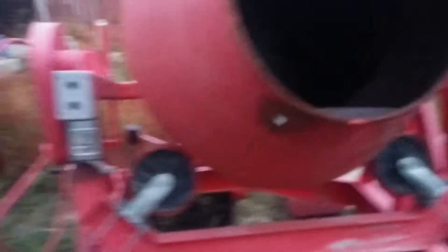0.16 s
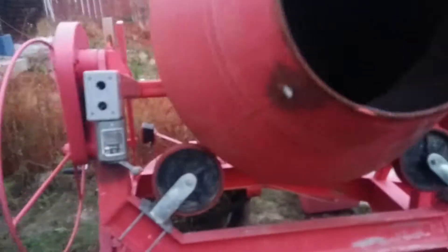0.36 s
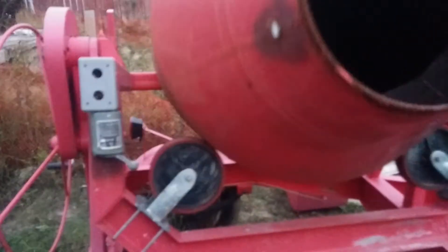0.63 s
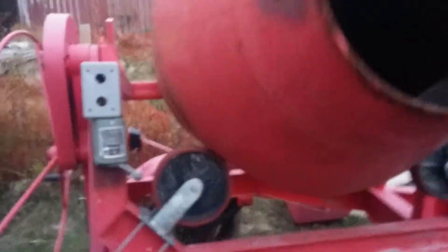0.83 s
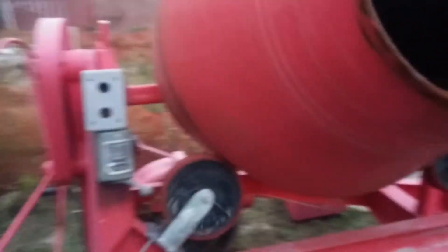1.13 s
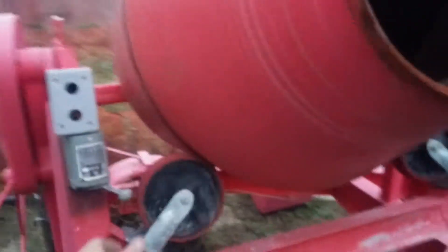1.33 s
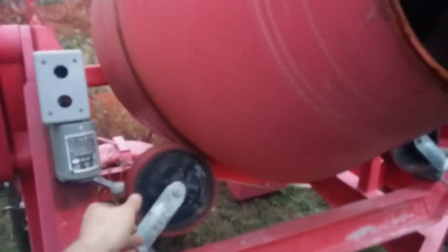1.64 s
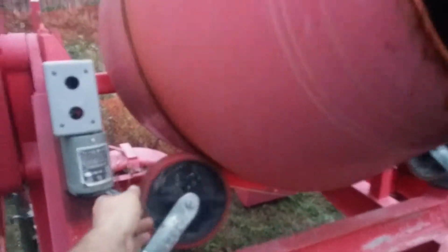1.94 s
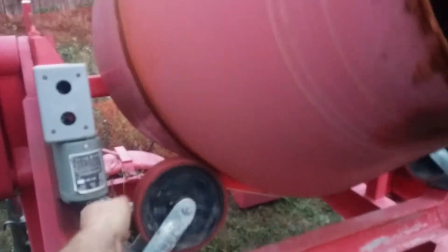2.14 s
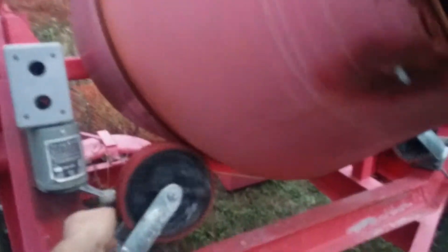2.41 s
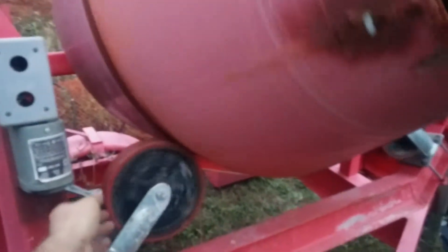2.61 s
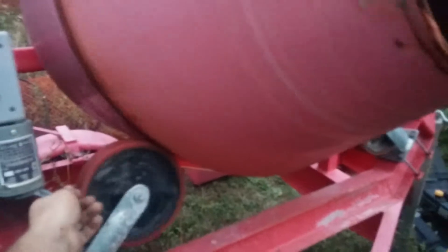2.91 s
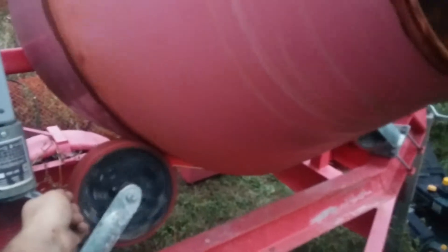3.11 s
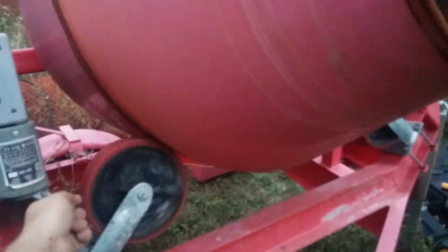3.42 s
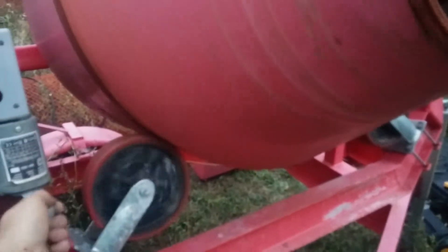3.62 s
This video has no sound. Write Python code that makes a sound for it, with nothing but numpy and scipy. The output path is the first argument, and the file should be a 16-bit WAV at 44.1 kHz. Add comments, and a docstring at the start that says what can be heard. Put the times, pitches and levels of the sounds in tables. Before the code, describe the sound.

A cement mixer drum turns with a low knocking rumble, rattling metal and hissing, clattering grit.

```python
"""A steady rumble with a knock at every gear tooth: a small cement mixer turns outdoors, heard close by.
Each tooth jolts the steel drum, which rumbles, booms and rattles as decaying tones shaken by tiny hits.
Grit hisses down the wall as filtered noise, soft lumps thud, and hard pieces skip and clatter.
Now and then the frame clanks or a roller rasps; a faint steady hiss lies behind it all."""
import sys
import numpy as np
from scipy import signal
from scipy.fft import rfft, irfft
from scipy.io import wavfile
from scipy.ndimage import uniform_filter1d

SR = 44100
rng = np.random.default_rng(int(sys.argv[2]) if len(sys.argv) > 2 else 0)


def generate_wav(sig):
    """Save sig (samples, or channels by samples) to the path in sys.argv[1] as 16-bit PCM at SR."""
    pcm = np.round(np.clip(np.atleast_2d(sig).T, -1, 1) * 32767).astype(np.int16)
    wavfile.write(sys.argv[1], SR, pcm)


N = 165816  # length in samples

# A "mode" is one tone at which a part likes to ring; T60 is the time a ring takes to drop by 60 dB.
# Drum modes, from low to hollow to booming. Each row: pitch in Hz, level in dB, T60 in seconds.
LOW_MODES = [(158.9, -8, 0.23), (181.2, 3.5, 0.27), (209.7, -1, 0.42), (249, -3, 0.3), (298.2, 4, 0.29),
             (316.3, 4.5, 0.11)]
HOLLOW_MODES = [(359.4, -3.5, 0.17), (384.4, -9, 0.23), (413.8, 1.5, 0.33), (432, -13, 0.36)]
BOOM_MODES = [(449, -4, 0.17), (487, 6, 0.33), (525, 0.5, 0.21), (566, 0, 0.17), (594.5, 3.5, 0.25),
              (687.3, -3, 0.084)]
# Modes of the parts that carry the drum. Each row: pitch in Hz, level in dB, T60 in seconds.
CLANK_MODES = [(926, 8, 0.053), (933, 0.5, 0.4), (1001, 4.5, 0.096), (1043, 7.5, 0.11), (1123, 0.5, 0.061),
               (1135, 11.5, 0.054), (1292, 1, 0.09)]
# Wall modes heard in the rattle. Each row: pitch in Hz, level in dB, T60 in seconds.
RATTLE_MODES = [(1358, -11, 0.1), (1440, -2.5, 0.49), (1573, -9, 0.049), (1513, -8, 0.28),
                (1754, 3.5, 0.17), (2032, 1, 0.039), (2290, -1, 0.12), (2465, -3, 0.23)]
# Long rings of the shell under hard blows. Each row: pitch in Hz, level in dB, T60 in seconds.
RING_MODES = [(2266, -3, .3), (2325, -6, .25), (2410, -6, .35), (2497, -3, .4), (2586, 1, .45),
              (2652, -4, .4), (2718, -4, .4), (3888, -2, .33), (3969, -2, .33), (4824, -4, .35),
              (4847, 0, .38), (4932, -7, .3), (5298, -3, .4), (5822, -4, .4)]

# Colours: how strongly each sound lets every pitch through. Each row: frequency in Hz, level in dB.
BODY_COLOUR = [(25, -59), (36, -53), (46, -1), (62, -17), (80, -18.5), (120, -5.5), (200, -19), (450, -6),
               (600, -6), (750, -9), (1000, -4.5), (2000, -72)]
CLANK_COLOUR = [(600, -1), (780, -9), (920, -3.5), (1120, 4), (1220, -9.5), (1400, 2.5), (2500, -49)]
RATTLE_COLOUR = [(600, -9.5), (1250, 0.5), (1500, 1), (1750, 6), (1900, -3), (2500, -1.5), (3100, -12.5),
                 (3600, 1), (4100, 4), (4500, -28), (6000, -34), (9000, -49), (16000, -58)]
WALL_COLOUR = [(600, -18.5), (1300, 6.5), (3000, 3), (8000, -20)]
FINE_COLOUR = [(1800, -30), (2800, -1.5), (3300, -5), (3650, 2), (4100, -5), (4500, -16.5), (6000, -12),
               (9000, -25.5), (16000, -29)]
TICK_COLOUR = [(2800, 4), (3650, -2.5), (4100, -1.5), (16000, -6.5)]
SCRAPE_COLOUR = [(300, -2), (1000, -8), (2800, -12.5), (4500, -7), (8000, -23), (16000, -38)]
CLATTER_COLOUR = [(200, -22), (900, -25), (1500, 0.5), (1800, 4.5), (2150, 9), (2550, 9.5), (2900, 7),
                  (3450, -0.5), (3950, 8.5), (4350, 0), (4900, 6.5), (5600, 2), (6200, 0.5), (7300, -10.5),
                  (10000, -14), (16000, -42)]
GRIT_COLOUR = [(500, -11.5), (2000, -1), (3200, 0.5), (4300, 4.5), (5200, 6), (6200, 4.5), (7400, 0),
               (8300, 4), (9100, 1.5), (10300, 8.5), (11500, 5.5), (13500, 2), (15700, -1.5)]

# Loudness of each lasting sound as time passes. Each row: time in seconds, level in dB.
RUMBLE_LEVEL = [(0, -53), (.65, -54), (1.0, -48.5), (1.14, -50.5), (1.28, -40.5), (1.42, -49.5),
                (1.6, -42.5), (1.7, -48), (1.82, -46), (2.08, -42.5), (2.25, -47), (2.45, -48.5),
                (2.58, -43), (2.75, -46), (2.88, -58), (3.02, -48.5), (3.12, -60.5), (3.4, -45),
                (3.54, -50), (3.63, -44), (3.76, -57)]
HOLLOW_LEVEL = [(0, -51), (.75, -53), (1.2, -57), (1.42, -43), (1.62, -45), (1.69, -45), (1.78, -45),
                (2.0, -40), (2.2, -43), (2.6, -41.5), (2.85, -48.5), (3.76, -51)]
BOOM_LEVEL = [(0, -40.5), (.15, -34.5), (.5, -37), (.62, -44), (.75, -44.5), (.82, -34), (.93, -45),
              (1.0, -34), (1.3, -35), (1.5, -36.5), (1.6, -33.5), (1.72, -46), (2, -36), (2.25, -40.5),
              (2.57, -35), (2.85, -46.5), (3, -32.5), (3.15, -43), (3.4, -33.5), (3.56, -44.5), (3.68, -33)]
CLANK_LEVEL = [(0, -46), (.1, -54), (.26, -45.5), (.38, -48), (.55, -44.5), (.75, -41), (.86, -39),
               (.95, -45), (1.05, -35), (1.2, -47), (1.45, -40), (1.58, -37), (1.7, -39), (1.85, -35.5),
               (2.27, -41), (2.55, -34.5), (2.75, -37.5), (2.88, -44.5), (3.02, -38), (3.2, -42),
               (3.6, -50.5), (3.76, -36.5)]
RATTLE_LEVEL = [(0, -43), (.3, -37.5), (.6, -36), (.75, -37.5), (.86, -39), (1.0, -37), (1.15, -38.5),
                (1.36, -38.5), (1.6, -38), (1.9, -40.5), (2.12, -42.5), (2.28, -42), (2.52, -34.5),
                (2.7, -33), (2.92, -40), (3.35, -41), (3.63, -41), (3.76, -26)]
FINE_LEVEL = [(0, -65.5), (.2, -59), (.4, -46.5), (.55, -43.5), (.75, -50), (.97, -53), (1.05, -48.5),
              (1.25, -50.5), (1.43, -51), (1.55, -42.5), (1.9, -51), (2.11, -61.5), (2.28, -58.5),
              (2.41, -47), (2.62, -67), (3.45, -55), (3.63, -65)]

# Rasps of the roller.
# Each row: start in seconds, length in seconds, lower and upper resonance in Hz, level in dB.
RASPS = [(0.79, 0.04, 1630, 2120, -29), (0.813, 0.057, 1600, 3330, -35.5),
         (0.864, 0.103, 1610, 1500, -38.5), (3.651, 0.0077, 1900, 2010, -35.5),
         (3.685, 0.028, 1620, 2570, -29.5), (3.704, 0.024, 1000, 2450, -35),
         (3.736, 0.02, 1990, 2790, -29.5)]
# Lumps dropping in the drum. Each row: start in seconds, pitch in Hz, level in dB.
THUDS = [(.112, 485, -35.5), (.18, 509, -36.5), (.28, 498, -40.5), (.445, 477, -32), (1.04, 418, -42.5),
         (1.143, 478.4, -39), (1.56, 400, -42), (1.722, 418.5, -41.5), (2.0, 422, -36), (2.922, 571, -37.5),
         (3.012, 585, -44), (3.205, 456, -42)]
# Single loud clanks of the frame. Each row: start in seconds, pitch in Hz, level in dB.
CLANKS = [(.368, 1120, -38.5), (1.297, 1115, -43), (1.545, 1114, -34.5), (1.895, 1122, -40.5),
          (2.205, 1110, -38), (2.297, 1120, -40), (2.399, 1100, -38), (2.485, 1110, -36.5),
          (2.575, 1040, -40.5)]
# Hard pieces chattering on the shell. Each row: start in seconds, level in dB, build-up in seconds,
# chatter decay in seconds, tilt in dB per octave, lower and upper resonance of the spot in Hz,
# level of the bounces in dB.
CLATTERS = [(0.246, -42.5, 0.0064, .046, -5.5, 1780, 5330, -39),
            (0.629, -40.5, 0.011, .02, -2, 2690, 5470, -49),
            (.796, -36, .011, 0.016, -6, 3374, 5040, -32.5),
            (1.551, -30, 0.012, 0.0073, -2, 4050, 5170, -37),
            (1.7557, -32.5, 0.0011, 0.018, -4, 2180, 4060, -31),
            (1.76, -35.5, 0.0042, 0.032, -1, 5810, 6230, -35.5),
            (2.681, -42.5, 0.0082, .013, 7, 4100, 5200, -40),
            (2.7273, -22, 0.00081, 0.077, 2, 2454, 4800, -24.5),
            (2.911, -34.5, .001, 0.01, 6.5, 5250, 6060, -33.5),
            (2.992, -31, 0.004, 0.032, 1, 2270, 2670, -34.5),
            (3.078, -26.5, 0.006, 0.03, 3, 2540, 5720, -29.5),
            (3.156, -28, 0.0036, 0.038, 4, 2330, 5400, -36.5),
            (3.345, -40.5, .003, 0.057, 0.5, 4180, 5320, -39)]
# Runs of grit down the wall. Each row: start in seconds, length in seconds, level in dB,
# fade in dB per second (below zero it swells), extra treble in dB.
SLIDES = [(0, .254, -64.5, -17, -7.5), (.224, 0.075, -37, 16, 4), (0.296, 0.15, -40.5, 66, 1.5),
          (0.458, .12, -40, 44, -4), (.56, 0.062, -53, 62, -4), (.623, 0.073, -38, 61, -1),
          (.695, 0.081, -54, 90, -2), (0.784, .13, -38, 94, 3.5), (0.924, .22, -54.5, 57, -5.5),
          (1.105, 0.34, -51, 102, -2), (1.254, 0.14, -66.5, -3, -2), (1.368, 0.021, -53, 40, 5.5),
          (1.385, .11, -59, 20, -0.5), (1.47, 0.14, -36, 93, 8.5), (1.566, 0.17, -34, 63, -3),
          (1.746, .081, -33, 145, -0.5), (1.834, 0.069, -38.5, 83, 0.5), (1.908, .16, -57, 42, -6),
          (2.24, 0.086, -61, -40, -9), (2.306, .18, -52.5, 35, -5), (2.339, 0.015, -54, 40, 6),
          (2.486, .18, -54, -56, -7.5), (2.669, 0.045, -37.5, 32, 1.5), (2.72, .18, -24, 66, -3),
          (2.906, 0.023, -27.5, 40, -2), (2.927, .22, -33.5, 27.5, -3.5), (3.152, .24, -29.5, 37, -6),
          (3.396, .12, -35, 67, -3), (3.507, .25, -47.5, 56, -11), (3.729, 0.034, -31.5, 57, -5.5)]

# Gear teeth: how often, when the first comes, how each jolt rises, dies away and varies in force
TOOTH_HZ, FIRST_TOOTH_S = 11.77, 0.016
TOOTH_ATTACK_S, TOOTH_FALL_S, TOOTH_SCATTER_DB = 0.0052, 0.027, 2
# Small impacts that stir a part
GRAINS_PER_S, GRAIN_SPREAD_DB = 700, -1
# Drum tones at each tooth: rise, spread of loudness, of pitch (as a fraction) and of timing
THROB_RISE_CYCLES, THROB_SPREAD_DB, THROB_DETUNE, THROB_SCATTER_S = 5.5, 3, .018, .013
STIR_DB = -5  # softer stirring between teeth
# Balance of the layers
RUMBLE_DB, BODY_DB, HOLLOW_DB, BOOM_DB = -1.5, -5, -3.5, -7.5
CLANK_DB, FRAME_DB, RATTLE_DB, WALL_DB, FINE_DB, FINE_GRIT_DB = -7, -6, -8, -10, -6.5, -7
RATTLE_ROLLING = .55  # steady rattling added to the jolts
KNOCK_RISE_S, KNOCK_T60_S, KNOCK_SPREAD_DB = 0.0012, 0.094, 12.5
# Thuds and clanks: the last value is how loud the other modes are beside the main tone
THUD_RISE_S, THUD_T60_S, THUD_GRAIN_DB = 0.021, 0.18, -12.5
CLANK_RISE_S, CLANK_T60_S, CLANK_FRAME_DB = 0.015, 0.081, -8.5
# Clatters: ring of the shell, then the skipping bounces (detune is a fraction of the pitch)
SHELL_T60_S, RING_DB = 0.33, -6
BOUNCE_GAP_S, BOUNCE_T60_S, BOUNCE_DETUNE, BOUNCE_FALL_S = .007, .035, .05, .052
SLIDE_ATTACK_S, SLIDE_STOP_S, GRIT_TREBLE_HZ = 0.011, 0.011, 8150
AIR_DB, TOP_HZ = -78, 15600


def teeth():
    """Jolt of each gear tooth as it takes up the load."""
    starts = FIRST_TOOTH_S + np.arange(N / SR * TOOTH_HZ) / TOOTH_HZ
    force = undb(TOOTH_SCATTER_DB * rng.standard_normal(size=64))
    return sum(f * blow(s, TOOTH_ATTACK_S, TOOTH_FALL_S) for s, f in zip(starts, force))


def drum(jolts, rolling=1.0):
    """The drum rumbles and booms in time with the teeth."""
    rumble = undb(RUMBLE_DB) * throb(jolts, LOW_MODES)
    shaking = (jolts + rolling) * grains(rate=2700, spread_db=-4.5)
    body = undb(BODY_DB) * unit(colour(shaking, BODY_COLOUR)) * lumpy()
    hollow = undb(HOLLOW_DB) * throb(jolts, HOLLOW_MODES)
    boom = undb(BOOM_DB) * throb(jolts, BOOM_MODES)
    low = (rumble + body) * follow(RUMBLE_LEVEL)
    return low + hollow * follow(HOLLOW_LEVEL) + boom * follow(BOOM_LEVEL)


def throb(jolts, table):
    """Every tooth sounds the drum modes, each a little early or late; the load stirs them in between."""
    out = np.zeros(N)
    # start one tooth early so that its ring is already there
    for s in FIRST_TOOTH_S + np.arange(-1, N / SR * TOOTH_HZ) / TOOTH_HZ:
        for hz, db, t60 in table:
            size, detune, lag = rng.standard_normal(3)
            tone = ping(hz * (1 + THROB_DETUNE * detune), THROB_RISE_CYCLES / hz, t60)
            add(out, s + THROB_SCATTER_S * lag, undb(db + THROB_SPREAD_DB * size) * tone)
    return unit(unit(out) + undb(STIR_DB) * stirred(jolts + 1, modes(table)))


def lumpy(rate=30, depth_db=3):
    """Gain that wobbles as the load shifts in lumps."""
    knots = np.clip(rng.standard_normal(size=512), -2, 2)
    wobble = np.interp(seconds() * rate, np.arange(len(knots)), knots)
    return unit(undb(depth_db * wobble))


def clanking(jolts, rolling=1.0):
    """Hollow clanks of the metal parts that carry the drum: random taps plus ringing modes."""
    taps = knocks(count=240, low_hz=721, high_hz=1320, t60=KNOCK_T60_S, spread_db=KNOCK_SPREAD_DB)
    taps = unit(colour((jolts + rolling) * taps, CLANK_COLOUR))
    frame = stirred(jolts + rolling, modes(CLANK_MODES))
    return (undb(CLANK_DB) * taps + undb(FRAME_DB) * frame) * follow(CLANK_LEVEL)


def rattle(jolts):
    """Brighter uneven taps, and wall resonances stirred in time with them."""
    shaking = jolts + RATTLE_ROLLING
    taps = knocks(count=1100, low_hz=1296, high_hz=2747, t60=0.055, spread_db=10.0)
    taps = unit(colour(shaking * taps, RATTLE_COLOUR))
    wall = unit(colour(stirred(shaking, modes(RATTLE_MODES)), WALL_COLOUR))
    return (undb(RATTLE_DB) * taps + undb(WALL_DB) * wall) * follow(RATTLE_LEVEL)


def fine_rattle(jolts):
    """The smallest pieces tick and grind with each tooth."""
    ticks = knocks(count=2200, low_hz=2740, high_hz=4346, t60=.035, spread_db=8.5)
    grinding = unit(colour(grains(rate=8000, spread_db=3.5), FINE_COLOUR))
    pieces = undb(FINE_DB) * ticks + undb(FINE_GRIT_DB) * grinding
    return unit(colour((jolts + RATTLE_ROLLING) * pieces, TICK_COLOUR)) * follow(FINE_LEVEL)


def knocks(count, low_hz, high_hz, t60, spread_db):
    """Small loose parts tap at random, each with its own pitch and short ring."""
    t = np.arange(SR // 10) / SR
    fade = (1 - np.exp(-t / KNOCK_RISE_S)) * np.exp(-np.log(1000) * t / t60)
    out = np.zeros(N + len(t))
    # one tap falls somewhere in each equal slice of time
    for k, (when, pitch, size) in enumerate(rng.random((count, 3))):
        i = int((k + when) / count * N)
        gain = undb(spread_db * min(-np.log(1 - size), 2))  # a few taps are much louder
        hz = low_hz + (high_hz - low_hz) * pitch
        out[i:i + len(t)] += gain * fade * np.sin(2 * np.pi * hz * t)
    return unit(out[:N])


def stirred(jolts, response):
    """Ring of a part under small impacts that grow stronger with the jolts."""
    return unit(ring(jolts * grains(GRAINS_PER_S, GRAIN_SPREAD_DB), response))


def rasps(upper_db=-1, scrape_db=-14):
    """The roller sticks and slips, ringing two short resonances each time."""
    out = 0
    for s, length, lower_hz, upper_hz, db in RASPS:
        swell = np.sin(np.pi * np.clip((seconds() - s) / length, 0, 1))
        slips = swell * grains(rate=3200, spread_db=3.5)
        tone = ring(slips, modes([(lower_hz, 0, .035), (upper_hz, upper_db, .03)]))
        scrape = crest(tone) + undb(scrape_db) * crest(slips)
        out = out + undb(db) * crest(colour(scrape, SCRAPE_COLOUR))
    return out


def thuds():
    """Soft lumps land and make the drum boom briefly."""
    return impacts(THUDS, BOOM_MODES, THUD_RISE_S, THUD_T60_S, THUD_GRAIN_DB)


def clanks():
    """Now and then the frame takes a harder knock."""
    return impacts(CLANKS, CLANK_MODES, CLANK_RISE_S, CLANK_T60_S, CLANK_FRAME_DB)


def impacts(rows, table, rise, t60, rest_db):
    """Each impact favours one resonance and stirs the other modes of the part less."""
    out, response = np.zeros(N), modes(table)
    for s, hz, db in rows:
        push = np.pad(rng.standard_normal(size=256), (0, SR // 2))  # a short burst, then room to ring
        add(out, s, undb(db) * crest(ping(hz, rise, t60)))
        add(out, s, undb(db + rest_db) * crest(ring(push, response)))
    return out


def clatters():
    """Hard pieces bounce in quick bursts and the shell rings, differently at each spot."""
    rings, out = modes(RING_MODES), 0
    for s, db, attack, fall, tilt_db, lower_hz, upper_hz, bounce_db in CLATTERS:
        hits = blow(s, attack, fall) * grains(rate=1400, spread_db=9.5)
        steel = crest(colour(ring(hits, sheet(SHELL_T60_S)), CLATTER_COLOUR, tilt_db))
        shell = steel + undb(RING_DB) * crest(ring(hits, rings))
        skips = bounces(s, attack, (lower_hz, upper_hz))
        out = out + undb(db) * crest(shell) + undb(bounce_db) * skips
    return out


def bounces(start, attack, pitches, count=32, rise=0.00015, spread_db=2.0):
    """A piece skips along the wall; the resonances shift from one contact to the next."""
    out, age = np.zeros(N), 0
    for gap, size in rng.random((count, 2)):
        build_up = min((age + BOUNCE_GAP_S / 2) / attack, 1)
        force = build_up * np.exp(-age / BOUNCE_FALL_S) * undb(spread_db * (2 * size - 1))
        for hz in pitches:
            shifted_hz = hz * (1 + BOUNCE_DETUNE * rng.standard_normal())
            add(out, start + age, force * ping(shifted_hz, rise, BOUNCE_T60_S))
        age += BOUNCE_GAP_S * (.5 + gap)
    return crest(out)


def slides():
    """Grit breaks loose, runs down the steel, mostly thinning out, and stops; some runs are brighter."""
    coarse, fine = 0, 0
    for s, length, db, fade_db, treble_db in SLIDES:
        age = np.maximum(seconds() - s, 0)
        onset = np.minimum(age / SLIDE_ATTACK_S, 1)
        stop = np.exp(-np.clip(age - length, 0, 1) / SLIDE_STOP_S)
        flow = onset * undb(db - fade_db * np.minimum(age, length)) * stop
        # overlapping runs add up as power, so they are squared here and rooted below
        coarse = coarse + flow ** 2
        fine = fine + (undb(treble_db) * flow) ** 2
    grit = unit(colour(grains(rate=17000, spread_db=3), GRIT_COLOUR))
    high_pass = signal.butter(2, GRIT_TREBLE_HZ, "high", fs=SR, output="sos")
    treble = signal.sosfiltfilt(high_pass, grit)
    return np.sqrt(coarse) * (grit - treble) + np.sqrt(fine) * treble


def air():
    """Faint, steady outdoor hiss: plain random noise."""
    return undb(AIR_DB) * rng.standard_normal(N)


def undb(db):
    """Decibels to gain."""
    return 10 ** (np.asarray(db) / 20)


def unit(x):
    """Scale to an average (rms) level of 1."""
    return x / np.sqrt(np.mean(x ** 2) + 1e-20)


def crest(x):
    """Scale so that the loudest 20 ms have rms 1."""
    return x / np.sqrt(uniform_filter1d(x ** 2, size=882).max() + 1e-20)


def seconds():
    """Time of every sample."""
    return np.arange(N) / SR


def follow(curve):
    """Gain that moves along (seconds, dB) points."""
    return undb(np.interp(seconds(), *np.array(curve).T))


def colour(x, points, tilt_db=0):
    """Filter through (Hz, dB) points, tilted per octave, that never sounds ahead of its input."""
    size = 2 ** 13
    octave = np.log2(np.maximum(np.arange(size // 2 + 1) * SR / size, 1))
    hz, db = np.array(points, float).T
    tilted = db + tilt_db * np.log2(hz / hz.mean())
    cepstrum = irfft(np.log(undb(np.interp(octave, np.log2(hz), tilted))))
    # folding the cepstrum (spectrum of the log spectrum) puts the response after time zero
    cepstrum[1:size // 2] *= 2
    cepstrum[size // 2 + 1:] = 0
    return ring(x, irfft(np.exp(rfft(cepstrum))))


def ring(x, response):
    """Let every push in x set off the response."""
    return signal.fftconvolve(x, response)[:len(x)]


def modes(table):
    """Response of separate decaying modes; dB sets the energy of each."""
    t = np.arange(SR // 2) / SR
    out = 0
    for k, (hz, db, t60) in enumerate(table):
        fade = np.exp(-np.log(1000) * t / t60)
        gain = (-1) ** k * undb(db) / np.sqrt(t60)  # neighbours start in opposite directions
        out = out + gain * fade * np.sin(2 * np.pi * hz * t)
    return out


def sheet(t60):
    """Response of sheet steel: countless close modes that die together, made as fading noise."""
    t = np.arange(SR // 2) / SR
    return rng.standard_normal(len(t)) * np.exp(-np.log(1000) * t / t60)


def grains(rate, spread_db):
    """Random tiny impacts of unequal size, rate per second."""
    size = undb(spread_db * np.clip(rng.standard_normal(N), -2, 2))
    return unit((rng.random(N) < rate / SR) * size * rng.choice([-1, 1], N))


def blow(start, attack, fall):
    """Force that builds up and dies away."""
    age = np.maximum(seconds() - start, 0)
    return np.minimum(age / attack, 1) * np.exp(-np.maximum(age - attack, 0) / fall)


def ping(hz, rise, t60):
    """One resonance that swells and dies away."""
    t = np.arange(int((rise + t60) * SR)) / SR
    swell = np.sin(np.pi / 2 * np.minimum(t / rise, 1))
    fade = np.exp(-np.log(1000) * np.maximum(t - rise, 0) / t60)
    return swell * fade * np.sin(2 * np.pi * (hz * t + rng.random()))


def add(out, start, sound):
    """Mix a sound in at a time in seconds, cutting what falls outside."""
    i = int(start * SR)
    part = sound[max(-i, 0):max(N - i, 0)]
    out[max(i, 0):max(i, 0) + len(part)] += part


def scene():
    """The mixer and its moving load over faint outdoor hiss."""
    jolts = teeth()
    machine = drum(jolts) + clanking(jolts) + rattle(jolts) + fine_rattle(jolts) + rasps()
    load = thuds() + clatters() + slides()
    return (machine + clanks() + load + air())[None]


def record(dry):
    """A steep low-pass filter removes the sound above TOP_HZ."""
    return signal.sosfilt(signal.ellip(10, .2, 80, TOP_HZ, fs=SR, output="sos"), dry)


dry = scene()
out = record(dry)
generate_wav(out)
```